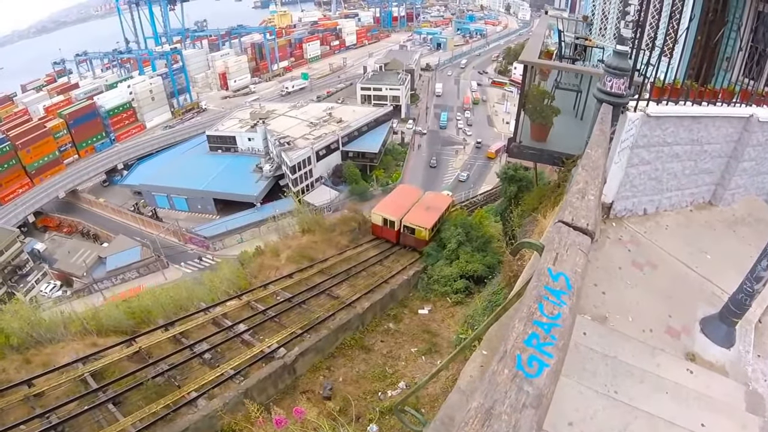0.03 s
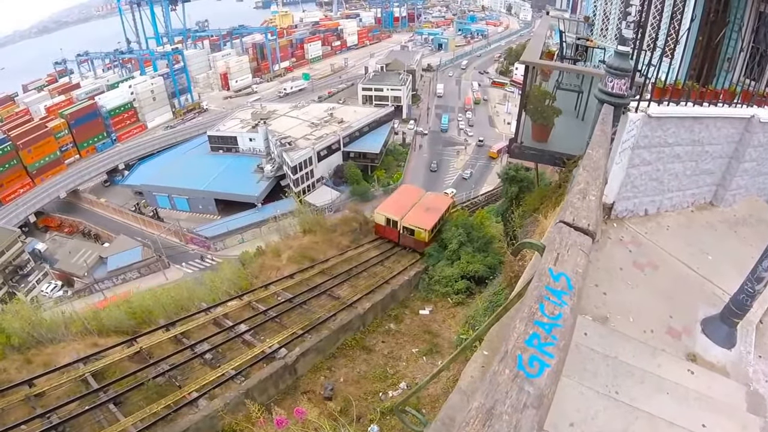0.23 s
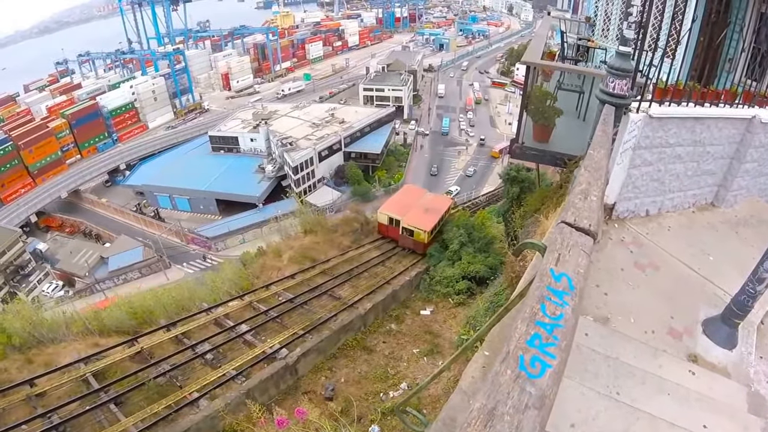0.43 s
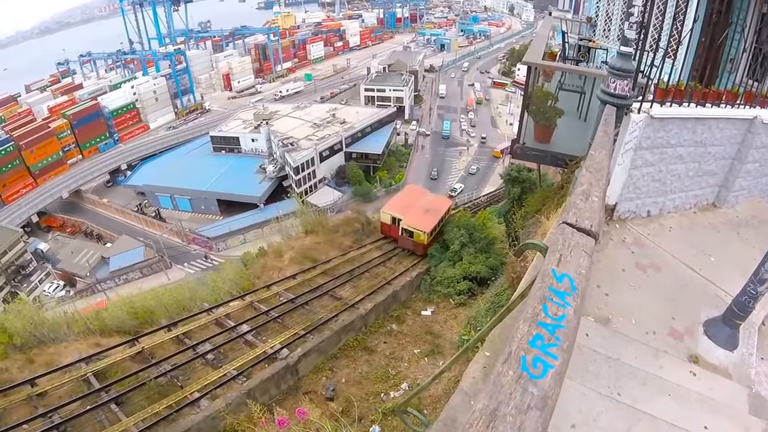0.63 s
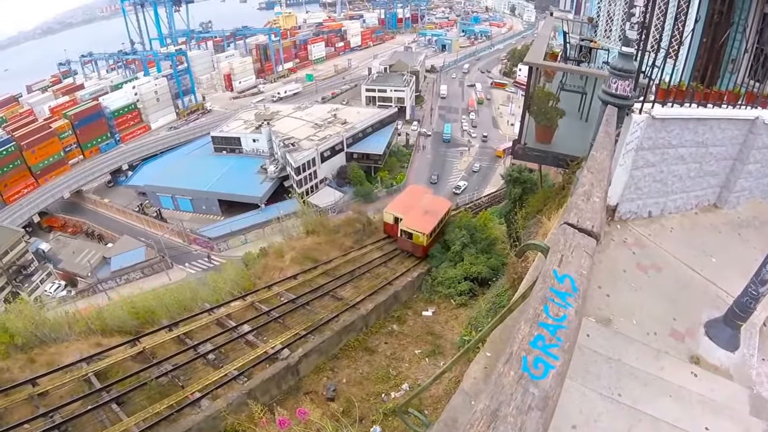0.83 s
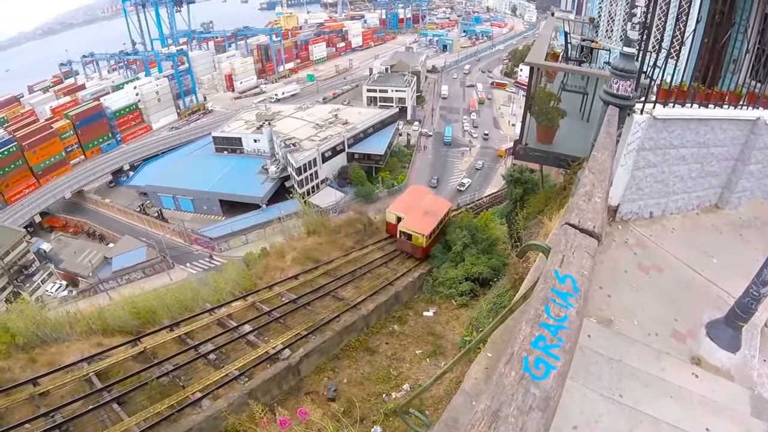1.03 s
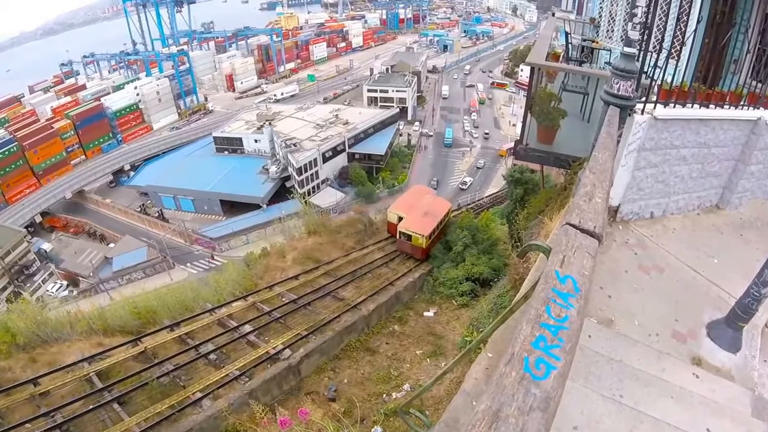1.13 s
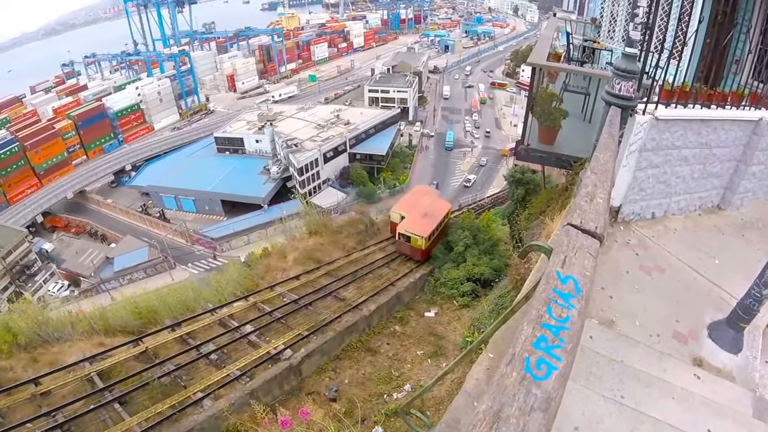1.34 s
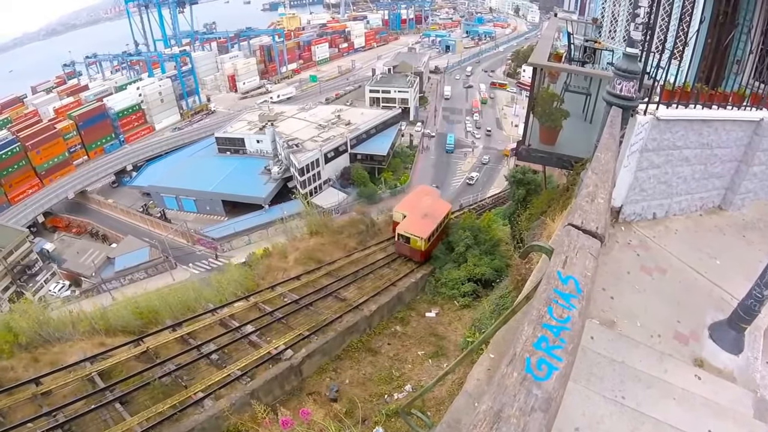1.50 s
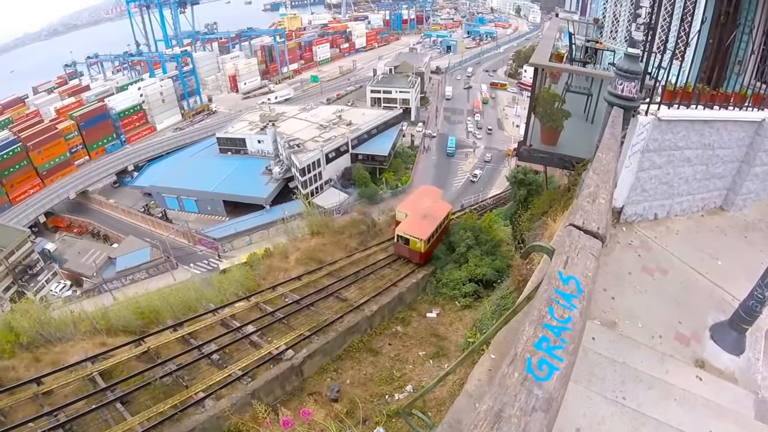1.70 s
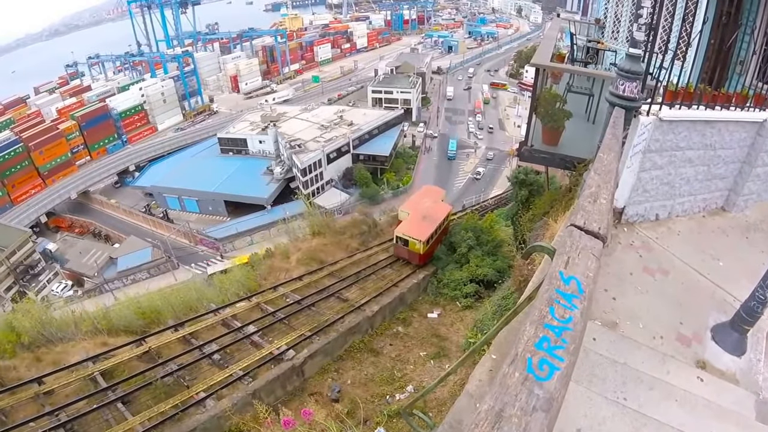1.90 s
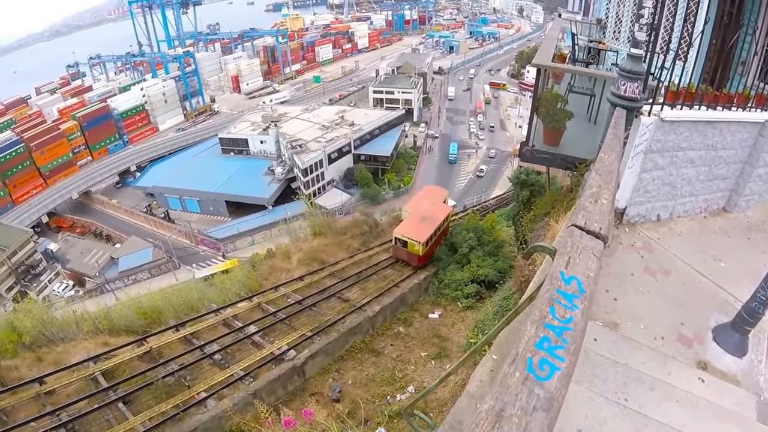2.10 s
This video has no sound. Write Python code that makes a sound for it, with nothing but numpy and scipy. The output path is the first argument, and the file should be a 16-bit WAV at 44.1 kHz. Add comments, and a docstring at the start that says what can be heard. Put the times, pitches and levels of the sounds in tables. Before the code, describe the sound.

Wind bumps the microphone with a few low thumps and one sharp tick, then settles to a soft rumble. From the hillside, far traffic and a container port blend into a steady hum, thin hiss and faint clinks.

```python
"""Hillside above a container port. Early on, a short gust knocks on the microphone several times
and one sharp tick rings the recorder's housing. Light wind rumbles on the microphone throughout.
Far traffic and machinery merge into a steady hum and a thin hiss,
with faint clinks and one faint squeal."""
import sys
import numpy as np
from scipy import signal
from scipy.fft import rfft, irfft
from scipy.io import wavfile

SR = 44100
rng = np.random.default_rng(int(sys.argv[2]) if len(sys.argv) > 2 else 0)


def master_out(mix):
    """Clip the mix to full scale and print it as 16-bit PCM to the path in sys.argv[1]."""
    frames = np.transpose(np.atleast_2d(mix))
    ceiling = np.clip(frames, -1, 1)
    pcm = np.round(ceiling * 32767).astype(np.int16)
    wavfile.write(sys.argv[1], SR, pcm)


N = 94815
TIME_S = np.arange(N) / SR

# eddies on the microphone: t/s, level/dB, rise/ms, fall/ms, sign (+1 push, -1 suction)
EDDIES = [(0.2431, -11, 0.63, 1, -1), (.3936, -11, 0.93, 0.89, -1), (.483, -30, 2.2, 3, -1),
          (.493, -28.5, 2.6, 4.7, 1), (.518, -25.5, 2.2, 2.2, 1), (.549, -20, 2.6, 3.1, 1),
          (0.5847, -11, 0.86, 3.2, 1), (0.869, -29.5, 1.6, 2.2, 1), (0.9209, -31, 1.5, 1.6, 1),
          (1.079, -35, 6, 6.8, 1), (1.336, -32, 5.4, 2.4, 1), (1.855, -30, 2.9, 4.5, -1)]
# touches within the tick: t/s from its start, level/dB
TICK_TOUCHES = [(0, -0.5), (.00034, 2.5), (.00092, -2)]
# housing modes: f/Hz, level/dB, t60/s
HOUSING_MODES = [(286, -20.5, 0.0068), (1330, -30, 0.02), (1774, -15.5, 0.0074), (2310, -28, 0.0074),
                 (2750, -30.5, 0.0061), (3545, -25.5, 0.0067), (4940, -36.5, 0.0044), (7350, -30.5, 0.012)]
# wind rumble spectrum: f/Hz, relative level/dB
WIND_SPECTRUM = [(10, 11.5), (20, -0.5), (30, 0.5), (50, -7.5), (80, -15), (130, -18), (250, -32),
                 (600, -71)]
# far traffic and port spectrum: f/Hz, relative level/dB
TRAFFIC_SPECTRUM = [(60, -0.5), (170, 0), (280, -3), (430, -5.5), (680, -11), (1000, -7.5), (1280, -7),
                    (1560, -17), (2000, -15), (3000, -25), (4200, -58), (8000, -45.5)]
# open-air hiss spectrum: f/Hz, relative level/dB
HISS_SPECTRUM = [(500, -2.5), (2200, 2), (3100, 1.5), (3950, -2.5), (4250, -4), (5200, -8.5), (5700, -9),
                 (6600, -13), (7700, -13.5), (9500, -20), (12500, -27), (14000, -47)]
# resonances in the hiss: f/Hz, width/Hz, rms level/dB
HISS_RESONANCES = [(2402, 230, -65), (2869, 100, -71.5), (3512, 232, -61.5), (3763, 277, -62),
                   (4565, 67, -74), (6044, 200, -77.5)]
# far clinks: t/s, resonance lift/dB
FAR_CLINKS = [(0.836, 4.5), (1.018, 6), (1.165, 3), (1.222, 5.5), (1.298, 6), (1.348, 3), (1.84, 4),
              (1.992, 4.5)]


def knocks():
    """Eddies hit the microphone: lopsided pressure pulses on wider skirts, turbulent inside."""
    skirt_share, flutter_db, flutter_hz = 0.36, -29.5, 670
    pressure = np.zeros(N)
    for at_s, db, rise_ms, fall_ms, sign in EDDIES:
        t_ms = (TIME_S - at_s) * 1000
        pulse = np.exp(-0.5 * (t_ms / np.where(t_ms < 0, rise_ms, fall_ms)) ** 2)
        skirt = skirt_share * bump(at_s, half_width_s=0.0074)
        pressure += sign * from_db(db) * (pulse + skirt)
    flutter = rms_one(lowpass(rng.standard_normal(N), flutter_hz, order=2))
    return diaphragm(pressure * (1 + from_db(flutter_db) * flutter))


def tick(at_s=0.3202, thump_db=-16.5, thump_rise_s=0.0067):
    """Slightly soft touches within 1 ms ring the housing and push on the microphone."""
    clicks = np.zeros(N)
    for after_s, db in TICK_TOUCHES:
        clicks[int(at_s * SR) + int(after_s * SR)] += from_db(db)
    contact = lowpass(clicks + 1e-18, cutoff_hz=4840, order=4)
    housing = sum(from_db(db) * ring(contact, hz, t60_s) for hz, db, t60_s in HOUSING_MODES)
    thump = from_db(thump_db) * swell(at_s, thump_rise_s) ** 2
    return housing + diaphragm(thump)


def wind(rms_db=-42.5, lumps_db=1.5):
    """Light wind on the microphone: lumpy low rumble."""
    lumps = from_db(lumps_db * drift(corner_hz=23))
    return from_db(rms_db) * rms_one(lumps * noise(WIND_SPECTRUM))


def traffic(level_db=-53, waver_db=0.96):
    """Far engines and tyres blur into one gently wavering hum."""
    return from_db(level_db + waver_db * drift(corner_hz=2.8)) * noise(TRAFFIC_SPECTRUM)


def hiss(level_db=-58.5, waver_db=1.7, clink_share=0.52):
    """Open-air hiss with separately wavering resonances; far clinks briefly lift both."""
    lift_db = sum(db * swell(at_s, rise_s=0.0083) for at_s, db in FAR_CLINKS)
    air = from_db(level_db + clink_share * lift_db) * noise(HISS_SPECTRUM)
    for hz, width_hz, db in HISS_RESONANCES:
        band_db = db + lift_db + waver_db * drift(corner_hz=23)
        air += from_db(band_db) * noise_band(hz, width_hz)
    return air


def squeal(level_db=-56.5):
    """Far squeal: a brief unsteady tone, barely above the hiss."""
    return from_db(level_db) * bump(at_s=1.25, half_width_s=0.028) * noise_band(hz=2420, width_hz=28)


def diaphragm(pressure, corner_hz=24, q=0.9):
    """Microphone bass limit, a resonant high-pass: slow swing back after each push."""
    w = 2 * np.pi * corner_hz
    return signal.lfilter(*signal.bilinear([1, 0, 0], [1, w / q, w * w], SR), pressure)


def ring(clicks, hz, t60_s):
    """One mode: a unit click starts a decaying sine of height 1."""
    r = from_db(-60 / (t60_s * SR))
    w = 2 * np.pi * hz / SR
    return signal.lfilter([0, np.sin(w)], [1, -2 * r * np.cos(w), r * r], clicks + 1e-18)


def noise(spectrum):
    """Shaped noise above 10 Hz, rms 1."""
    hz, db = np.transpose(spectrum)
    bins_hz = np.maximum(np.arange(N // 2 + 1) * SR / N, 1)
    gain = from_db(np.interp(np.log(bins_hz), np.log(hz), db)) * (bins_hz > 10)
    return rms_one(irfft(rfft(rng.standard_normal(N)) * gain, N))


def noise_band(hz, width_hz):
    """Narrow-band noise, rms 1."""
    band = signal.butter(2, [hz - width_hz / 2, hz + width_hz / 2], "band", fs=SR, output="sos")
    return rms_one(signal.sosfilt(band, rng.standard_normal(N)))


def drift(corner_hz):
    """Slow random wavering, mean 0, rms 1."""
    bins_hz = np.arange(N // 2 + 1) * SR / N
    gain = (bins_hz > 0) / (1 + (bins_hz / corner_hz) ** 2)
    return rms_one(irfft(rfft(rng.standard_normal(N)) * gain, N))


def bump(at_s, half_width_s):
    """Gaussian envelope, peak 1."""
    return np.exp(-((TIME_S - at_s) / half_width_s) ** 2)


def swell(at_s, rise_s):
    """Fast rise, slower fall, peak 1."""
    age = np.maximum(TIME_S - at_s, 0) / rise_s
    return age * np.exp(1 - age)


def lowpass(x, cutoff_hz, order):
    """Maximally flat low-pass."""
    return signal.sosfilt(signal.butter(order, cutoff_hz, fs=SR, output="sos"), x)


def from_db(db):
    """Decibels to gain."""
    return 10 ** (np.asarray(db) / 20)


def rms_one(x):
    """Scale to rms 1."""
    return x / np.sqrt(np.mean(x ** 2) + 1e-20)


def scene():
    """Far port under the wind at the microphone, mono."""
    port = traffic() + hiss() + squeal()
    return (port + wind() + knocks() + tick())[None]


def record(dry):
    """Steep treble cut."""
    cutoff_hz = 14000
    return signal.sosfilt(signal.ellip(10, 0.1, 80, cutoff_hz, fs=SR, output="sos"), dry)


dry = scene()
out = record(dry)
master_out(out)
```